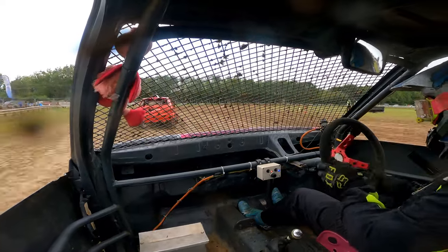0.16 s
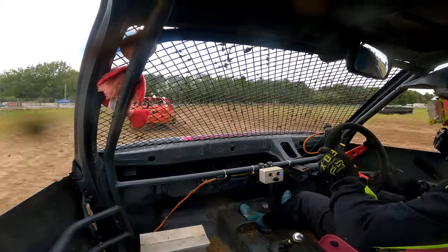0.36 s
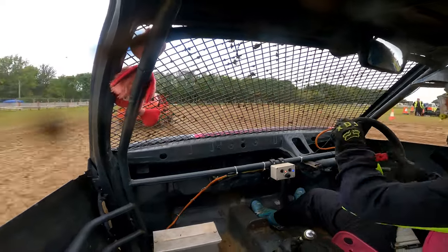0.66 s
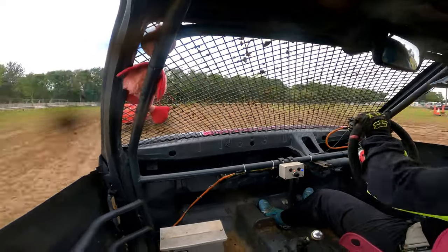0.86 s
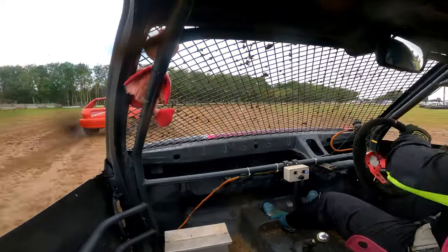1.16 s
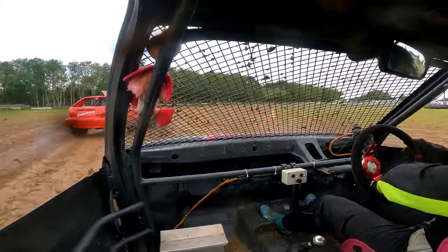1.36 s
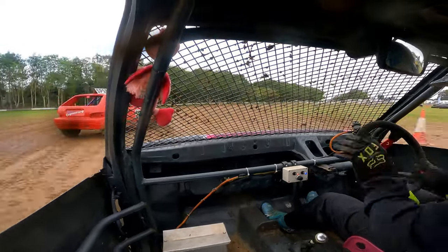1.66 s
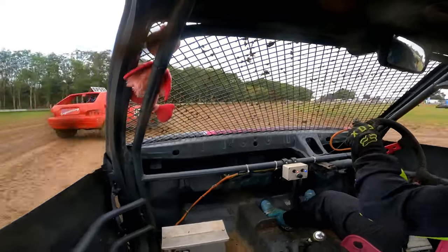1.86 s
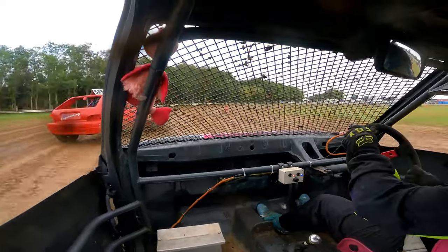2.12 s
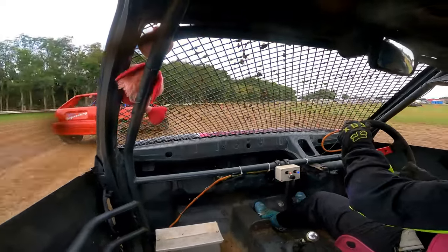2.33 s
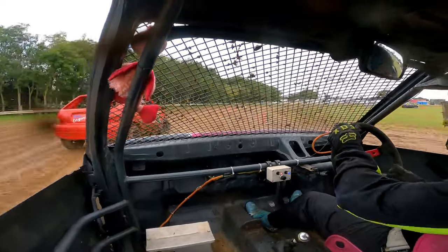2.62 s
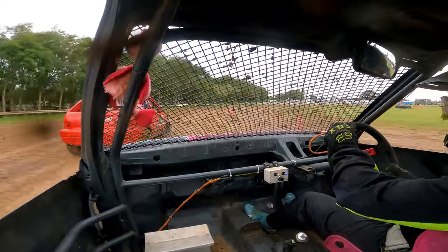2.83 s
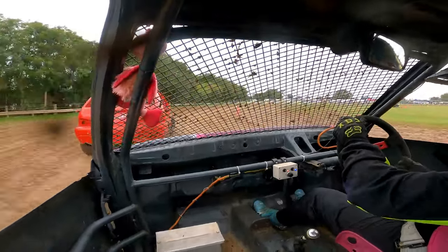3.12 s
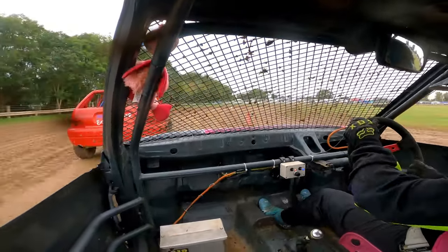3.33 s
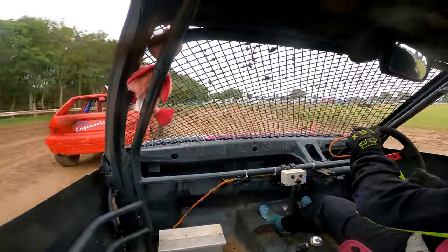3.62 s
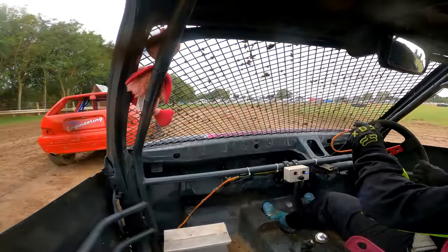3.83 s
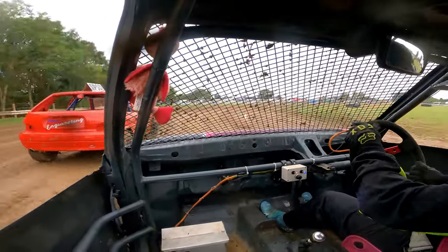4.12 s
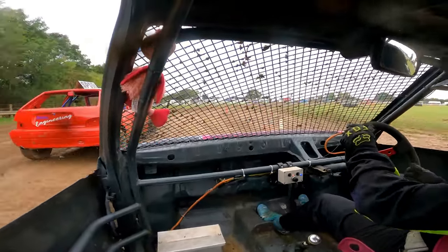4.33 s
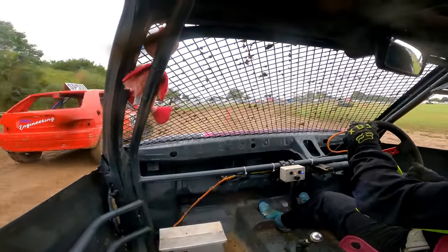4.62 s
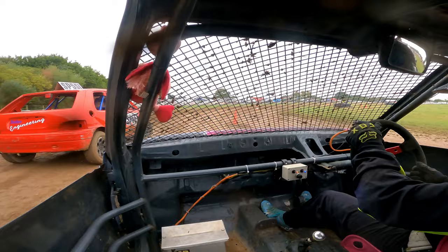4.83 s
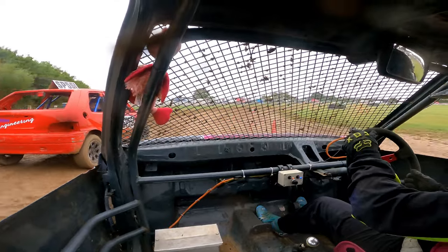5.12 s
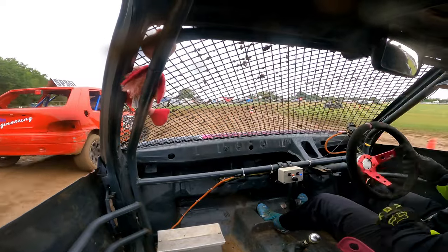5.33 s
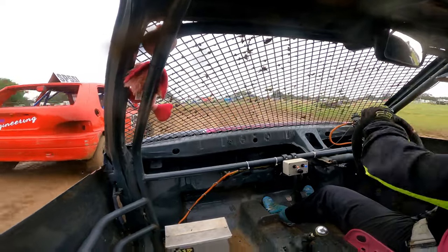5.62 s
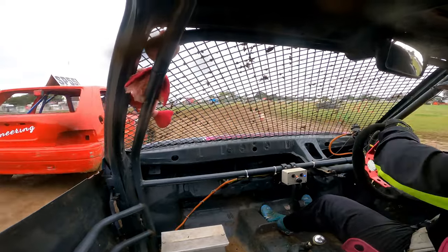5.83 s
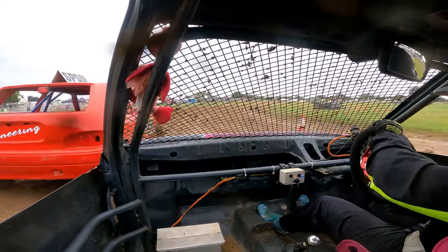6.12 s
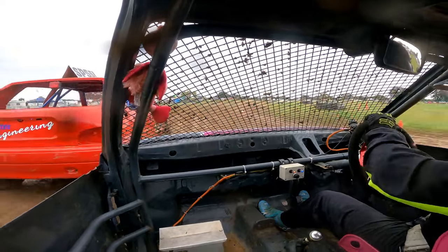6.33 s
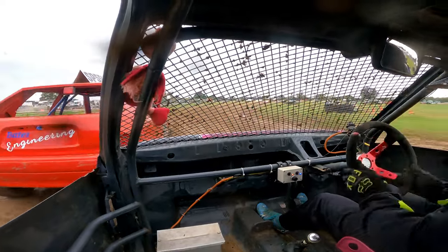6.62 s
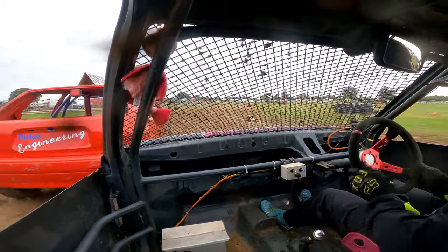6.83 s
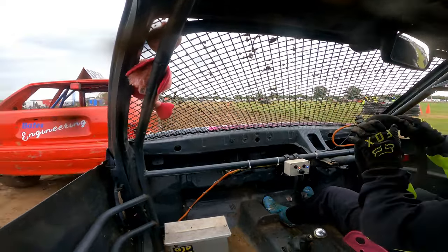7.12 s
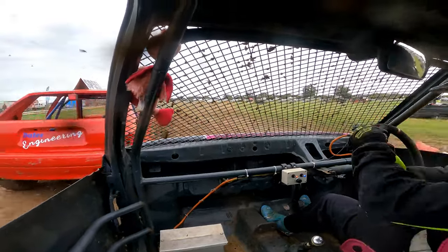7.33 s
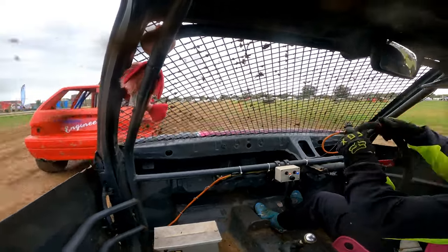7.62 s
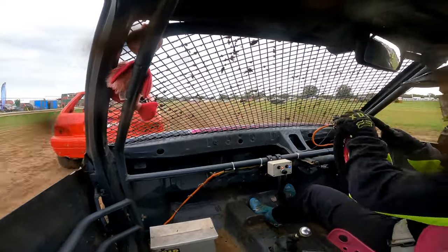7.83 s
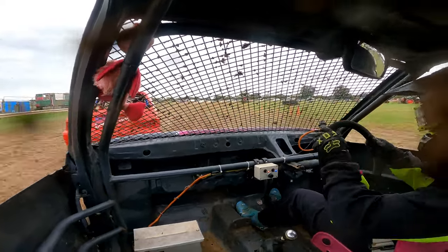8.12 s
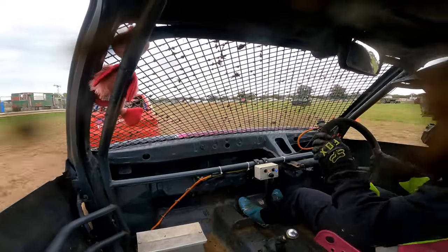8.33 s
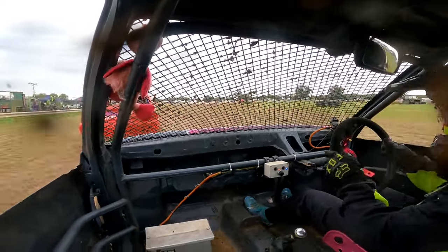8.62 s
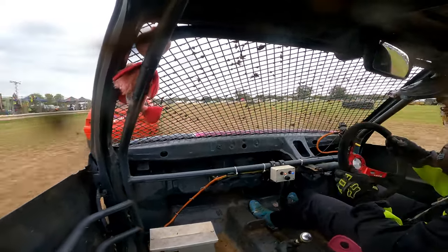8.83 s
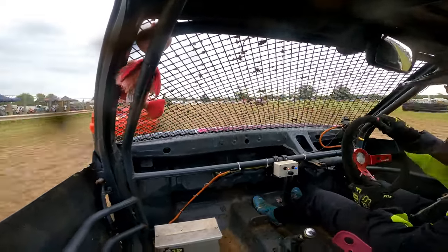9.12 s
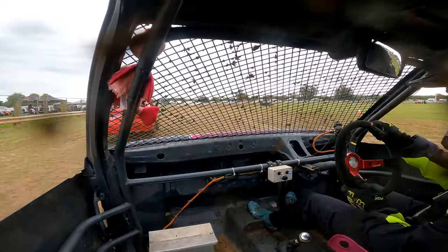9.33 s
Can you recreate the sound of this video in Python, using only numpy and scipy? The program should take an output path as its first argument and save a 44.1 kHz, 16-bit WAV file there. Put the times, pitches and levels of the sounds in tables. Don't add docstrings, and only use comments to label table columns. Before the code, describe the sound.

A continuous low engine roar fills a bare steel cabin from start to end. Rough chattering of a loose camera mount rides over it, thickest in the first few seconds, with hard knocks again around seven seconds. Metal panels sing in short wavering hums, gravel patters, stones tap sharply and loose parts clatter. Close, muffled, compressed cabin sound, stopping abruptly.

```python
import sys
import numpy as np
from scipy import signal
from scipy.fft import rfft, irfft, next_fast_len
from scipy.io import wavfile
from scipy.ndimage import uniform_filter1d

SR = 44100
rng = np.random.default_rng(int(sys.argv[2]) if len(sys.argv) > 2 else 0)


def voltage_ratio(decibels):
    exponent = np.asarray(decibels, float) / 20
    return 10 ** exponent


def to_wav(sig):
    pcm = np.clip(np.atleast_2d(sig), -1, 1) * 32767
    pcm = np.round(pcm).astype(np.int16)
    wavfile.write(sys.argv[1], SR, pcm.T)


N = 417186

# centre in Hz, width in Hz, level in dB.
STEEL_PARTS = [(2130, 700, 3), (2810, 300, -3), (3354, 490, 1.5), (5000, 850, -7.5), (6400, 1050, -10.5),
               (9100, 3400, -12)]


def rms_one(x):
    return x / np.sqrt(np.mean(x ** 2) + 1e-20)


def in_time(rows):
    s, *columns = np.transpose(rows)
    return [np.interp(np.arange(N) / SR, s, c) for c in columns]


def drift(rate):
    points = rng.standard_normal(4000)
    coarse = np.arange(0, N + 32, 32)
    at = np.minimum(coarse * rate / SR, len(points) - 2)
    k = at.astype(int)
    step = .5 - .5 * np.cos(np.pi * (at - k))
    return np.interp(np.arange(N), coarse, rms_one(points[k] * (1 - step) + points[k + 1] * step))


def coloured(spectrum):
    hz, db = np.transpose([*spectrum, (SR / 2, -130)])
    size = next_fast_len(N)
    grid_hz = np.maximum(np.arange(size // 2 + 1) * SR / size, 1)
    shape = voltage_ratio(np.interp(np.log(grid_hz), np.log(hz), db, left=-90))
    return rms_one(irfft(rfft(rng.standard_normal(size)) * shape, size)[:N])


def resonance(x, hz, width):
    r = np.exp(-np.pi * width / SR)
    gain = (1 - r * r) / 2
    return signal.lfilter([gain, 0, -gain], [1, -2 * r * np.cos(2 * np.pi * hz / SR), r * r], x + 1e-18)


def body(x, modes):
    return sum((-1) ** k * voltage_ratio(db) * resonance(x, hz, width) for k, (hz, width, db) in enumerate(modes))


def low_pass(x, hz):
    return signal.sosfilt(signal.butter(2, hz, fs=SR, output="sos"), x)


def dying(hits, fall_s):
    return signal.lfilter([1], [1, -np.exp(-1 / (fall_s * SR))], hits)


def wavering(hz, wobble_hz, speed, flutter_db):
    turns = np.cumsum(hz + wobble_hz * drift(speed)) / SR
    return rms_one(voltage_ratio(flutter_db * drift(speed)) * np.sin(2 * np.pi * turns)), turns


def grains(per_s, spread_db):
    sizes = voltage_ratio(spread_db * np.minimum(rng.exponential(1, N), 4)) * rng.choice([-1, 1], N)
    return sizes * (rng.random(N) < per_s / SR)


def spells(rows):
    fade_s = 0.039
    t = np.arange(0, N + 64, 64) / SR
    level = 0
    for start, end, *_, db in rows:
        inside = np.clip(np.minimum(t - start, end - t) / fade_s + 1, 0, 1)
        level = level + voltage_ratio(db) * inside ** 2
    return np.interp(np.arange(N) / SR, t, level)


def engine():
    # time in seconds, firing rate in Hz, tone level in dB.
    firing = [(0, 192, -18), (.6, 176, -13.5), (1.05, 160, -22.5), (1.3, 178, -17), (1.7, 158, -12.5),
              (2.25, 163, -17), (2.5, 179, -13.5), (3.2, 167, -18), (4.0, 197, -15.5), (4.65, 173, -16.5),
              (5.3, 200, -17), (5.9, 182, -17), (6.17, 198, -17), (6.55, 187, -15), (7.6, 191, -20.5),
              (8.05, 180, -15.5), (8.4, 191, -17), (9.46, 188, -20.5)]
    # frequency in Hz, density in dB per Hz.
    boom_spectrum = [(10, -16), (25, 0.5), (60, 3.5), (120, 3), (185, 7), (225, -4.5), (300, -20.5),
                     (500, -42), (1800, -41)]
    firing_hz, tone_db = in_time(firing)
    tone, _ = wavering(firing_hz, wobble_hz=4.63, speed=35, flutter_db=2.0)
    boom = voltage_ratio(-13.5 + 1.5 * drift(4.5)) * coloured(boom_spectrum)
    return voltage_ratio(tone_db - 2.0) * tone + boom


def shell_and_rattle():
    # time in seconds, pitch in Hz, level in dB.
    shudder_curve = [(0.0, 42.34, -23), (0.13, 49.07, -24), (1.24, 35.99, -17.5), (1.52, 48.21, -17.5),
                     (1.82, 37.83, -17.5), (2.26, 41.75, -20.5), (2.69, 37.1, -20.5), (5.56, 40.22, -21),
                     (6.3, 36.74, -21), (6.46, 44.98, -26.5), (7.27, 34.38, -22), (9.04, 35.39, -25),
                     (9.33, 38.2, -29), (9.46, 46.9, -30)]
    # time in seconds, level in dB.
    ruts = [(0.0, -25.5), (0.02, -24), (1.13, -20.5), (1.16, -33), (1.24, -24), (1.26, -29), (1.76, -19.5),
            (1.79, -25), (2.11, -19.5), (2.16, -29), (3.69, -25), (3.71, -28), (5.01, -24.5), (5.64, -26.5),
            (5.74, -20.5), (6.53, -26), (6.74, -20.5), (9.46, -22.5)]
    # centre in Hz, width in Hz, level in dB.
    mount_modes = [(924, 127, 6), (1066, 220, 3.5), (1195, 170, 3), (1398, 120, 2.5)]
    # frequency in Hz, density in dB per Hz.
    roar_spectrum = [(140, -20), (230, 1.5), (265, -6), (350, -13.5), (570, -3.5), (790, -10), (950, -6.5),
                     (1060, -2), (1400, -8.5), (1540, -14.5), (1680, -9.5), (2000, -23), (3000, -34),
                     (7000, -56.5)]

    shudder_hz, shudder_db = in_time(shudder_curve)
    shudder, turns = wavering(shudder_hz, wobble_hz=4.0, speed=14, flutter_db=1.0)
    knock_db, = in_time(ruts)
    swing_db = knock_db - knock_db.mean()

    beat = (.5 + .5 * np.cos(4 * np.pi * turns)) ** 1.6 * voltage_ratio(4.4 * np.clip(drift(40), -2, 1.6))
    knocking = body(grains(900 + 2500 * beat, spread_db=1.5) * (1.4 + beat), mount_modes)
    knocking = resonance(knocking, 1130, 790)
    roar = coloured(roar_spectrum) * voltage_ratio(1.5 * drift(22) + 0.44 * knock_db - 13.5)
    hard = hard_knocks()
    steady = airborne(hard) * (voltage_ratio(knock_db - 6) * rms_one(knocking) + roar)

    roof = resonance(resonance(grains(500, spread_db=5.0), 285, 110), 285, 220)
    door = resonance(resonance(grains(700, spread_db=5.0), 440, 220), 440, 300)
    roof_level = voltage_ratio(-35.5 + 0.11 * swing_db + 4.5 * drift(6))
    door_level = voltage_ratio(-35 + 0.11 * swing_db + 4.5 * drift(6))
    drumming = roof_level * rms_one(roof) + door_level * rms_one(door)
    return voltage_ratio(shudder_db + 1.66) * shudder + steady + grit(beat, swing_db) + drumming + knocks(turns, hard)


def hard_knocks():
    # time in seconds, peak in dB.
    single = [(0.242, -13.5), (0.666, -19), (0.732, -11.5), (0.998, -14.5), (1.022, -13), (1.078, -11),
              (1.491, -11), (1.76, -7), (1.849, -15.5), (2.031, -4), (2.4, -13), (2.482, -9.5), (2.563, -8),
              (2.977, -10), (3.065, -12.5), (3.121, -6), (3.842, -12), (4.205, -9.5), (4.248, -13),
              (4.279, -11), (5.004, -16), (6.099, -13), (6.716, -12), (6.98, -8), (7.096, -4.5),
              (7.356, -6), (7.752, -3.5), (7.856, -8), (7.965, -13), (8.607, -10)]
    # start in seconds, number of knocks, gap in seconds, peak in dB.
    bounces = [(0.779, 2, .015, -8), (0.910, 3, .0155, -10), (1.196, 4, 0.014, -11), (1.599, 3, 0.023, -12),
               (1.916, 3, .023, -8.5), (1.99, 3, 0.015, -10), (2.059, 2, 0.022, -11),
               (2.722, 2, 0.015, -8.5), (3.227, 2, .014, -9.5), (3.338, 3, 0.021, -10.5),
               (3.440, 4, 0.029, -9), (3.628, 6, 0.015, -10), (4.099, 2, .027, -9), (4.334, 2, .027, -10.5),
               (4.876, 2, 0.029, -8), (5.056, 3, 0.014, -10.5), (6.008, 2, .029, -8),
               (7.714, 2, 0.014, -16.5), (7.784, 2, 0.012, -13)]
    hits = list(single)
    for s, count, gap_s, db in bounces:
        for k in range(round(count)):
            hits.append((s + k * gap_s, db + 4.5 * rng.uniform(-1, 1)))
    return hits


def airborne(hard):
    left = np.ones(N)
    span = round(0.0036 * SR)
    for s, _ in hard:
        at = round(s * SR)
        left[at - span:at] = 1 - 0.18
    return uniform_filter1d(left, size=44)


def knocks(turns, hard):
    light_share, light_db, light_spread_db = .03, -15.5, 4
    t = np.arange(900) / SR
    shape = t / 0.0015 * np.exp(1 - t / 0.0011)
    out, puffs = np.zeros(N + len(t)), np.zeros(N)

    beats_s = np.flatnonzero(np.diff(np.floor(2 * turns))) / SR
    light_s = beats_s[rng.random(len(beats_s)) < light_share]
    light = [(s, light_db + light_spread_db * rng.uniform(-1.5, 1.5)) for s in light_s]
    for s, peak_db in [*hard, *light]:
        at = round(s * SR)
        hz = 1045 + 65 * rng.standard_normal()
        out[at:at + len(t)] += voltage_ratio(peak_db + 1.5) * shape * np.sin(2 * np.pi * hz * t)
        puffs[at] = voltage_ratio(peak_db - 13)
    puffs = np.convolve(puffs, shape[:300])[:N] * rng.standard_normal(N)
    return out[:N] + low_pass(body(puffs, STEEL_PARTS), 6000)


def grit(beat, swing_db):
    # time in seconds, peak in dB.
    clumps = [(0.0, -35), (0.571, -22), (1.078, -38.5), (1.2078, -26), (1.5755, -33), (1.949, -36),
              (2.0637, -36.5), (2.2206, -32.5), (2.8459, -30), (3.105, -31), (3.3499, -36), (3.4894, -23),
              (3.626, -29), (3.655, -31), (4.0956, -25), (4.4684, -34.5), (4.8698, -30), (5.07, -31.5),
              (5.69, -33), (6.0001, -33), (6.792, -28.5), (6.9084, -28), (6.95, -28), (7.0718, -28),
              (7.1, -28), (7.18, -26), (7.33, -28), (7.518, -24.5), (7.6276, -25), (7.6892, -29),
              (8.7354, -23.5), (8.988, -35.5)]
    rise_s, fall_s = 0.0045, 0.017
    s, db = np.transpose(clumps)
    hits = np.full(N, 1e-18)
    hits[np.round(s * SR).astype(int)] = voltage_ratio(db - 8.0)
    rise = signal.lfilter([0, 1], [1, -np.exp(-1 / (rise_s * SR))], hits[::-1])[::-1]
    thrown = rise + dying(hits, fall_s) + voltage_ratio(-38 + 0.73 * swing_db)
    spray = grains(5000 + 3000 * beat, spread_db=0.5) * (8.6 + beat)
    parts = sum(voltage_ratio(db + 2.5 * drift(25)) * resonance(spray, hz, width) for hz, width, db in STEEL_PARTS)
    return thrown * rms_one(low_pass(parts, 8000))


def panels():
    # start in seconds, end in seconds, level in dB.
    pan_spells = [
        (0, .7, -37),
        (1.8, 2.1, -37.5),
        (2.7, 3.05, -32.5),
        (3.3, 3.55, -34.5),
        (3.75, 4.4, -30.5),
        (4.5, 6.8, -29),
        (7.2, 7.5, -32.5),
        (7.85, 9.2, -44),
    ]
    # start in seconds, end in seconds, start pitch in Hz, end pitch in Hz, level in dB.
    mesh = [(0, .3, 1645, 1656, -36), (1.0, 1.4, 1650, 1655, -38.5), (2.2, 2.5, 1674, 1671, -51),
            (2.62, 2.72, 1660, 1678, -36), (2.82, 3.2, 1654, 1669, -38), (4.42, 4.5, 1650, 1638, -40),
            (4.76, 4.84, 1645, 1627, -34.5), (4.9, 5.45, 1601, 1597, -37), (5.55, 6.05, 1664, 1650, -32),
            (6.25, 6.65, 1657, 1685, -34.5), (6.85, 7.15, 1667, 1727, -39.5),
            (7.58, 7.63, 1658, 1673, -28.5), (8.5, 8.9, 1639, 1640, -35.5), (8.95, 9.05, 1660, 1657, -35),
            (9.07, 9.18, 1671, 1642, -27), (9.38, 9.46, 1722, 1706, -28.5)]
    door = [(.24, .66, 1443, 1428, -31), (.76, .98, 1403, 1400, -33), (2.2, 2.7, 1410, 1390, -41),
            (2.85, 3.7, 1375, 1340, -42), (5.8, 6.05, 1400, 1420, -29.5), (6.4, 7.3, 1402, 1431, -32.5),
            (8.1, 8.45, 1446, 1420, -32.5), (8.55, 8.75, 1430, 1440, -30.5), (8.85, 9.25, 1400, 1430, -31),
            (9.3, 9.46, 1380, 1400, -32)]
    sill = [(4.75, 5.4, 1322, 1289, -32.5), (5.55, 6.1, 1322, 1360, -29.5), (7.5, 8.4, 1276, 1268, -33),
            (8.5, 8.85, 1240, 1307, -29.5), (8.95, 9.3, 1306, 1266, -34)]
    dash = [(.05, .7, 1066, 1035, -33.5), (5.3, 5.6, 1040, 1043, -33.5), (6.1, 6.4, 1041, 1054, -33.5),
            (6.6, 6.85, 926, 947, -35.5), (8.2, 8.55, 1182, 1176, -34), (9.28, 9.44, 880, 895, -29)]
    pan_hz = 576.4
    floor_pan = rms_one(resonance(resonance(rng.standard_normal(N), pan_hz, 33), pan_hz, 49))
    pan_tone, _ = wavering(pan_hz, wobble_hz=6.0, speed=25, flutter_db=3.5)
    floor_pan = rms_one(floor_pan + 0.24 * pan_tone)
    singing = song(mesh, 7.8, 30) + song(door, 11.24, 35) + song(sill, 10.0, 35) + song(dash, 7.1, 30)
    return (spells(pan_spells) + voltage_ratio(-43.5)) * floor_pan + singing


def song(rows, wobble_hz, speed):
    points = []
    for start, end, from_hz, to_hz, _ in rows:
        points += [(start, from_hz), (end, to_hz)]
    hz, = in_time(points)
    tone, _ = wavering(hz + 6 * drift(9), wobble_hz, speed, flutter_db=3.2)
    return spells(rows) * tone


def stones():
    # time in seconds, peak in dB, low part against the peak in dB.
    stone_hits = [(0.0742, -41.5, -2), (0.174, -44.5, -3.5), (0.241, -44, -2), (0.3019, -40, -5),
                  (0.3514, -25.5, -13.5), (0.4358, -38.5, -5.5), (0.637, -35, 0.5), (0.67, -28, -0.5),
                  (1.577, -39, 3.5), (2.03, -45.5, 5), (2.09, -45, 14), (2.5212, -35.5, 6.5),
                  (2.938, -39, 3), (3.506, -46, 8), (3.5395, -39.5, 8), (3.8016, -44.5, 8.5),
                  (4.2743, -45, -3), (4.6282, -41, 0), (5.0831, -43, 5), (5.689, -43.5, 1.5),
                  (7.5155, -28.5, 2), (7.538, -40, -4), (7.638, -38.5, -4), (7.6845, -40.5, 1),
                  (7.7236, -28.5, 0.5), (7.94, -24, -5.5), (7.972, -40.5, -3.5), (8.6116, -30.5, -6),
                  (8.7484, -43.5, -2.5), (9.011, -31.5, 4.5)]
    # centre in Hz, width in Hz, level in dB.
    ring_modes = [(5000, 99, 0.5), (6940, 120, 5.5), (9100, 250, -1.5)]
    s, peak_db, low_db = np.transpose(stone_hits)
    at = np.round((s + .0017) * SR).astype(int)
    ring = np.zeros(N)
    for hz, width, db in ring_modes:
        struck = np.zeros(N)
        struck[at] = voltage_ratio(peak_db + db + 34.5 + 4.0 * rng.standard_normal(len(s)))
        ring += resonance(struck, hz, width)

    taps = np.zeros((2, N))
    taps[:, at] = voltage_ratio([peak_db + 19, peak_db + low_db + 22])
    high, low = 2 * taps + dying(taps + 1e-18, .0018) * rng.choice([-1, 1], N)
    edge = resonance(resonance(high, 12500, 5000), 12500, 6000)
    crack = resonance(resonance(high, 7500, 4500), 8500, 12000)
    thud = resonance(resonance(low, 3100, 3000), 3100, 4000)
    return crack + voltage_ratio(-2) * thud + ring + voltage_ratio(-2) * edge


def slaps(s, peak_db, length_s):
    hits = np.full(N, 1e-18)
    hits[np.round(s * SR).astype(int)] = voltage_ratio(peak_db)
    return dying(hits, length_s) * rng.choice([-1, 1], N)


def rattles():
    # time in seconds, peak in dB.
    slap_hits = [(0.0784, -30), (0.3528, -30), (0.6655, -22.5), (1.018, -30), (1.0768, -29), (1.1772, -31),
                 (1.2093, -24), (1.5764, -26.5), (1.6232, -31), (1.949, -28), (1.9919, -29.5),
                 (2.0634, -31.5), (2.0812, -23.5), (2.2199, -29), (2.3192, -31.5), (2.5208, -26.5),
                 (2.7766, -32.5), (2.847, -33.5), (3.0472, -29), (3.1048, -27), (3.1325, -27),
                 (3.3513, -31.5), (3.3822, -27.5), (3.4601, -29), (3.5067, -19.5), (3.6272, -27),
                 (3.6559, -24.5), (3.8402, -35), (3.904, -30.5), (4.0618, -33), (4.0966, -25),
                 (4.176, -22.5), (4.2023, -33), (4.335, -29.5), (4.453, -32), (4.6164, -26.5),
                 (5.9106, -25.5), (6.1577, -30.5), (6.2748, -34), (6.3937, -36), (6.7453, -30),
                 (6.9087, -29.5), (6.9719, -26), (7.0069, -24.5), (7.1775, -25.5), (7.199, -22),
                 (7.3239, -30), (7.4919, -27), (7.5176, -17), (7.627, -20.5), (7.7184, -25), (7.859, -26.5),
                 (7.9388, -25.5), (8.3944, -30), (8.5687, -26), (8.6452, -29.5), (8.714, -20),
                 (8.8038, -32), (8.8509, -31), (9.0107, -22)]
    # centre in Hz, width in Hz, level in dB.
    loose_modes = [(2250, 300, 3.5), (2860, 300, -1), (3400, 300, 3.5), (3900, 320, -3), (5000, 300, -4),
                   (6850, 300, -9.5)]
    # time in seconds, peak in dB.
    pebbles = [(0.1007, -59), (0.3875, -57.5), (0.4763, -60), (0.7502, -61), (0.8325, -63.5),
               (0.9263, -65.5), (1.0141, -63.5), (1.1228, -65.5), (1.1867, -69.5), (1.2226, -67.5),
               (1.3399, -66), (1.8522, -70), (2.1241, -66), (2.6584, -65.5), (2.7372, -69), (2.8549, -66.5),
               (3.4945, -65.5), (3.6441, -64), (4.0083, -68), (5.8551, -66), (6.6794, -70), (7.007, -63.5),
               (7.0833, -62), (7.7872, -60), (7.8396, -67), (7.9114, -60.5), (8.0077, -60), (8.0341, -65),
               (8.2641, -58), (8.6692, -61), (8.7789, -53.5), (8.976, -66.5)]
    s, peak_db = np.transpose(slap_hits)
    out = np.zeros(N)
    for hz, width, db in loose_modes:
        mix_db = 6.5 * rng.standard_normal(len(s))
        out += resonance(slaps(s, peak_db + mix_db + 6 + db, .002), hz, width)
    tick_s, tick_db = np.transpose(pebbles)
    ticks = resonance(resonance(slaps(tick_s, tick_db + 39, .002), 10500, 6000), 11500, 8000)
    sizzle = resonance(resonance(rng.standard_normal(N), 12900, 1500), 12900, 2000)
    return out + ticks + voltage_ratio(-56.5 + 6.0 * drift(14)) * rms_one(sizzle)


def gravel():
    # start in seconds, end in seconds, level in dB.
    showers = [
        (0, .48, -47),
        (.6, .75, -48),
        (.8, 1.3, -56),
        (1.9, 2.15, -53),
        (6.75, 7.45, -57),
        (7.5, 7.56, -50.5),
        (7.68, 8.05, -51),
        (8.3, 9.46, -54),
    ]
    # centre in Hz, width in Hz, level in dB.
    thin_parts = [(3360, 60, 0.5), (5000, 70, 1), (6850, 55, -1.5), (9100, 90, -2), (11500, 200, -8)]
    crackle = resonance(resonance(grains(2500, spread_db=6.5), 12000, 8000), 13000, 9000)
    crackle = crackle * voltage_ratio(3.0 * drift(15))
    rings = np.zeros(N)
    for hz, width, db in thin_parts:
        rings += voltage_ratio(db) * rms_one(resonance(grains(60, spread_db=3.5), hz, width))
    return (spells(showers) + voltage_ratio(-63.5)) * (rms_one(crackle) + voltage_ratio(-10.5) * rings)


def seams():
    # pitch in Hz, level in dB.
    hums = [(900, -39.5), (975, -38.5), (1110, -38.5), (1190, -38.5), (1250, -40), (1345, -40)]
    # time in seconds, pitch in Hz, peak in dB.
    pings = [
        (0.353, 7000, -36),
        (0.667, 6900, -38),
        (7.54, 8800, -40),
        (7.615, 5000, -36),
        (7.672, 6750, -32),
        (7.94, 7700, -35),
        (8.0, 5100, -39),
        (8.05, 6700, -39),
        (8.645, 3970, -35),
    ]
    t = np.arange(4000) / SR
    out = np.zeros(N + len(t))
    shape = np.minimum(t / .002, 1) * np.exp(-t / .018)
    for s, hz, db in pings:
        at = round(s * SR)
        out[at:at + len(t)] += voltage_ratio(db) * shape * np.sin(2 * np.pi * hz * t)
    out = out[:N]
    for hz, db in hums:
        tone, _ = wavering(hz + 18 * drift(3), wobble_hz=6.99, speed=30, flutter_db=2.5)
        out += voltage_ratio(db + 4 * drift(4)) * tone
    return out


def scene():
    mix = engine() + shell_and_rattle() + panels() + stones() + rattles() + gravel() + seams()
    return mix[None]


def top_cut(x):
    return signal.sosfilt(signal.butter(12, 15400, fs=SR, output="sos"), x)


def record(dry):
    hold = np.exp(-1 / (0.0091 * SR))
    level = np.sqrt(signal.lfilter([1 - hold], [1, -hold], dry ** 2) + 1e-9)
    held = dry * np.minimum(1, 0.26 / level)
    rounded = 1.294 * np.tanh(held / 1.161)
    dulled = low_pass(low_pass(rounded, 2337), 10200)
    soft_stop = np.sin(np.pi / 2 * np.clip((N - np.arange(N)) / 60, 0, 1)) ** 2
    return top_cut(dulled * soft_stop)


dry = scene()
out = record(dry)
to_wav(out)
```